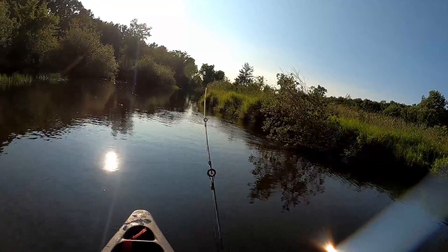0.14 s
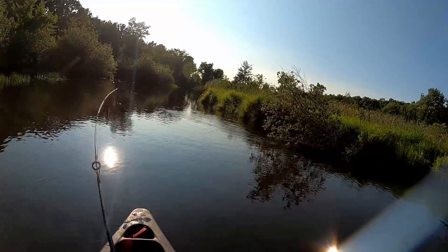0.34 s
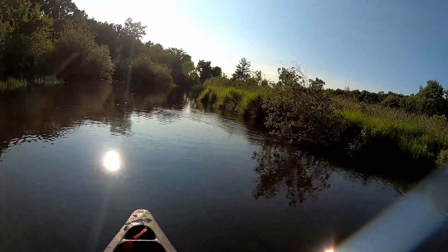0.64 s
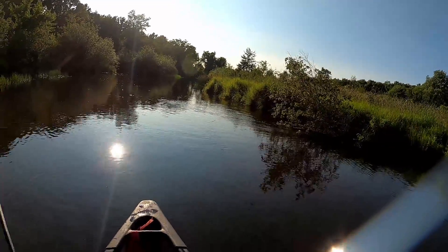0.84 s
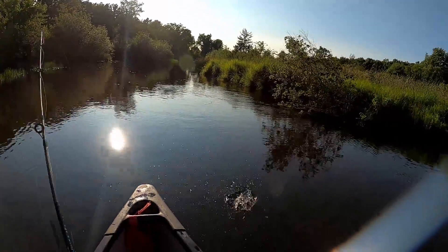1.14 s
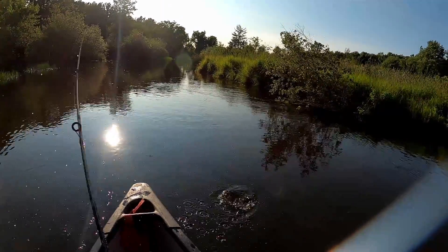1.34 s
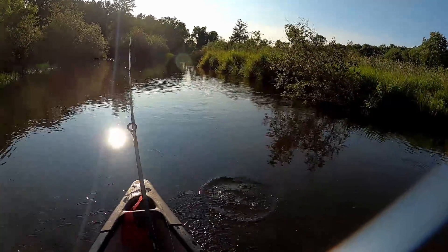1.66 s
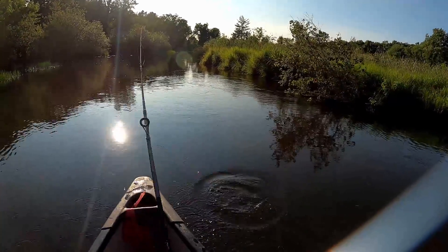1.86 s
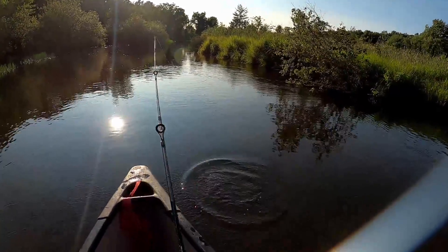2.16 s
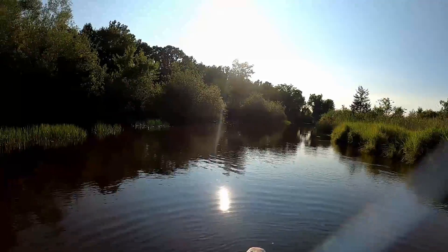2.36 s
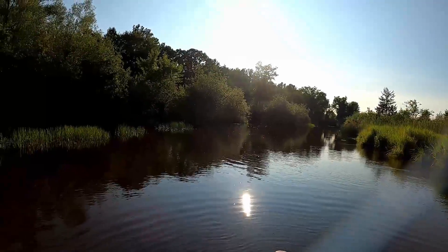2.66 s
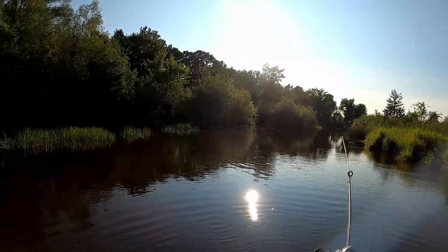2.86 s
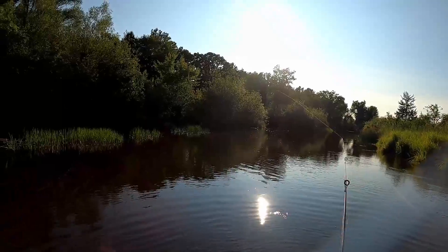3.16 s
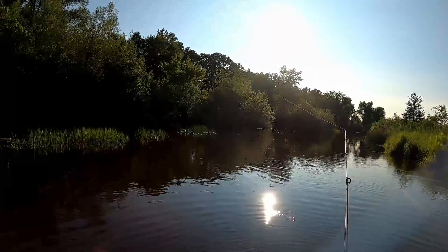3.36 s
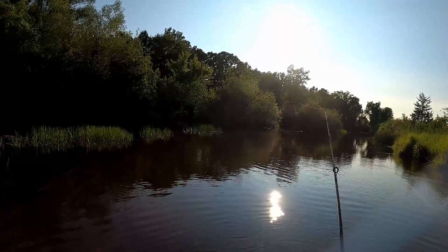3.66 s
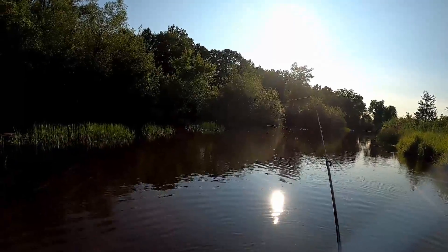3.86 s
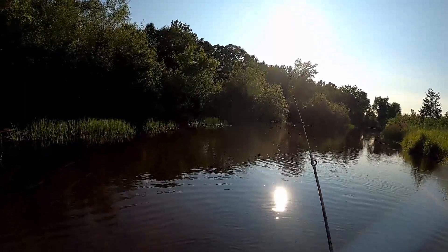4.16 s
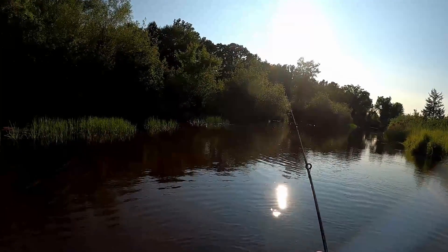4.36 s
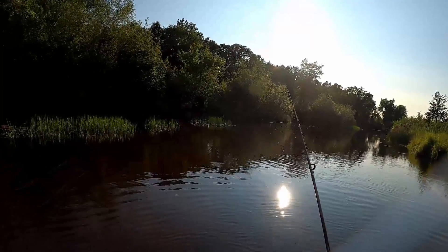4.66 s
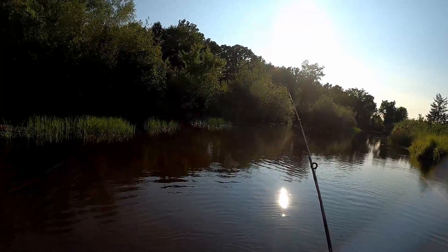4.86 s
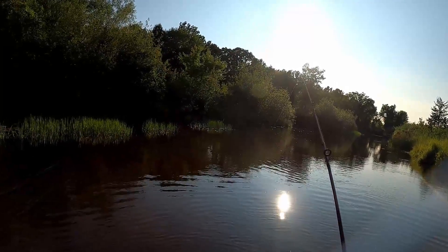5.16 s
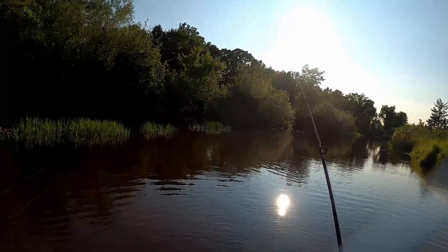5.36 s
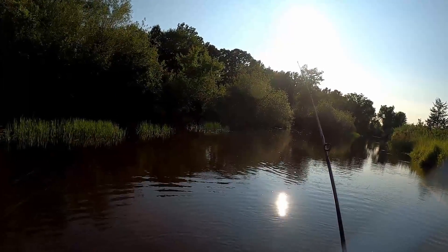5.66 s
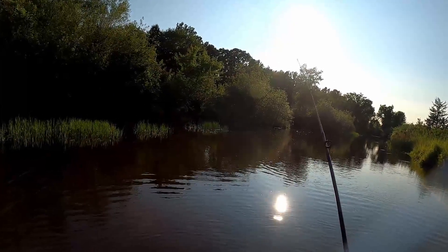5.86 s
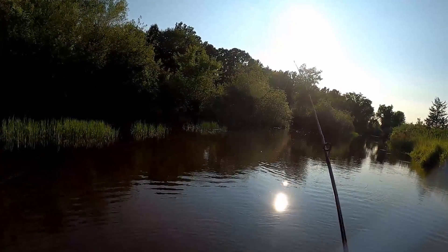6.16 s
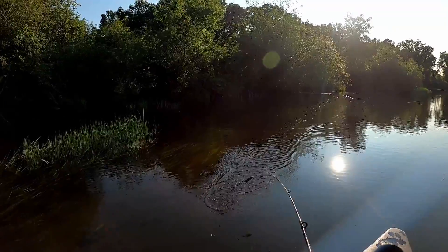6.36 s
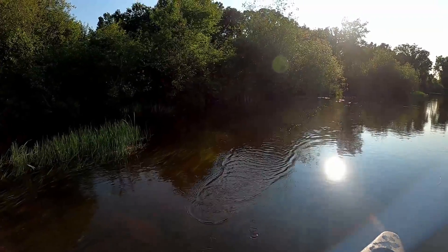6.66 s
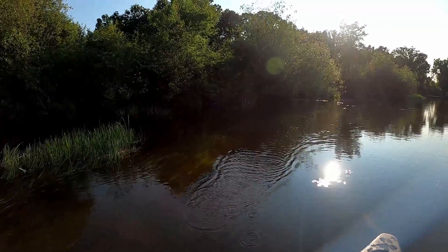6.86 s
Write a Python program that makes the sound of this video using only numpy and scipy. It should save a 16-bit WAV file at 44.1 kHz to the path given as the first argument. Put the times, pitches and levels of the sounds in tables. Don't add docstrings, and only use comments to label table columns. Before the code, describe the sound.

Close outdoor sound from a small plastic boat on still water. A reel grates in wet line; a lure breaks the surface with crisp splashes, bubbles and dripping. A sharp latch snap, then line hisses out with a high singing whirr and dull hull knocks. The latch clacks shut, light gear winding follows, and a loud snap comes near the end. Low wind buffets the microphone, strongest early.

```python
import sys
import numpy as np
from scipy import signal
from scipy.fft import rfft, irfft
from scipy.io import wavfile
from scipy.ndimage import uniform_filter1d

SR = 44100
rng = np.random.default_rng(int(sys.argv[2]) if len(sys.argv) > 2 else 0)


def gain_from_db(level_db):
    decades = np.asarray(level_db, float) / 20
    return 10 ** decades


def unload_wav(signal):
    wavfile.write(
        sys.argv[1],
        SR,
        np.round(np.clip(np.atleast_2d(signal).T, -1, 1) * 32767).astype(np.int16),
    )


N = 309052
T = np.arange(N) / SR


def in_time(rows):
    s, *columns = np.transpose(rows)
    return [np.interp(T, s, c) for c in columns]


def gate(rows):
    fade_in = np.clip((T - rows[0][0]) * 100 + .5, 0, 1)
    fade_out = np.clip((rows[-1][0] - T) * 100 + .5, 0, 1)
    return fade_in * fade_out


def hump(start, end):
    return np.sqrt(np.sin(np.pi * np.clip((T - start) / (end - start), 0, 1)).clip(0))


def rms_one(x):
    return x / np.sqrt(np.mean(x ** 2) + 1e-20)


def colour(x, spectrum, low_hz=1, high_hz=1e5):
    hz, points = np.arange(N // 2 + 1) * SR / N + 1e-3, np.array(spectrum)
    shaped = rfft(x) * gain_from_db(np.interp(np.log(hz), np.log(points[:, 0]), points[:, 1], -90, -90))
    inside = irfft(shaped * (hz > low_hz) * (hz < high_hz), N)
    return irfft(shaped, N) / inside.std()


def drift(rate):
    r = np.exp(-2 * np.pi * rate / SR)
    return rms_one(signal.lfilter([1], [1, -2 * r, r * r], rng.standard_normal(N + SR))[SR:])


def resonance(x, hz, width):
    r = np.exp(-np.pi * width / SR)
    top_gain = np.array([1, 0, -1]) * (1 - r * r) / 2
    return signal.lfilter(top_gain, [1, -2 * r * np.cos(2 * np.pi * hz / SR), r * r], x)


def double_resonance(x, hz, width):
    return resonance(resonance(x, hz, width), hz, width)


def singing(hz, width):
    low_pass = signal.butter(2, width / 2, fs=SR, output="sos")
    slow = signal.sosfilt(low_pass, rng.standard_normal((2, N)))
    phase = 2 * np.pi * np.cumsum(hz * np.ones(N)) / SR
    return rms_one(slow[0] * np.cos(phase) + slow[1] * np.sin(phase))


def swells(rows):
    return sum(gain_from_db(db + 3.4 * drift(23)) * hump(start, end) * singing(hz, width)
               for start, end, hz, width, db in rows)


def add(out, s, db, sound):
    i = round(s * SR)
    sound = sound[:N - i]
    out[i:i + len(sound)] += gain_from_db(db) * sound / np.abs(sound).max()


def rustle(rows, spectrum, grain_db, per_s, top_db, bright):
    body_db = in_time(rows)[0]
    top_db = body_db + top_db + 2.7 * drift(10) + bright * (body_db + 59)
    sizes = gain_from_db(4.8 * rng.exponential(1, N).clip(0, 4)) * rng.choice([-1, 1], N)
    grains = (rng.random(N) < per_s / SR) * sizes
    grains = np.convolve(grains, rng.standard_normal(90) * np.hanning(90))[:N]
    raw = rng.standard_normal(N) * gain_from_db(1.8 * drift(14)) + gain_from_db(grain_db) * rms_one(grains)
    hiss = colour(raw, spectrum, low_hz=700, high_hz=6000)
    body = signal.sosfiltfilt(signal.butter(4, 6000, fs=SR, output="sos"), hiss)
    return gate(rows) * (gain_from_db(body_db) * body + gain_from_db(top_db) * rms_one(hiss - body))


# time in seconds, level in dB.
WINDING = [
    [(0.0, -78), (0.36, -76.5), (0.46, -55.5), (0.58, -62.5), (1.15, -57), (1.28, -53.5), (1.61, -59.5),
     (2.2, -59.5), (2.26, -67)],
    [(2.26, -88), (2.502, -74), (2.722, -66), (2.88, -68)],
    [(4.4, -58.5), (4.446, -66.5), (4.826, -63.5), (4.972, -67.5), (5.326, -64.5), (6.27, -62.5)],
    [(6.27, -57), (6.366, -61), (6.604, -70.5), (6.808, -64), (7.008, -54)],
]
# frequency in Hz, density in dB per Hz.
WET_LINE = [(180, -28), (300, -0.5), (700, -4), (1020, 2), (3240, -4), (4920, -13), (8240, -37),
            (16000, -59)]
GEARS = [(180, -12), (300, 5), (440, -17), (678, -10.5), (1230, -3.5), (1780, 2.5), (2070, -0.5), (3520, 1),
         (4440, -11), (5700, -15), (7440, -27.5), (8790, -28), (16000, -57)]
LATE_GEARS = [(180, -26), (300, -7), (462, -10), (978, -14), (1170, -6), (1340, -12.5), (2980, -13.5),
              (4370, -15.5), (16000, -62.5)]


def winding():
    first, pause, second, last = WINDING
    out = rustle(first, WET_LINE, -8, 600, -9.5, 0.34)
    out += rustle(pause, CREEK, -26, 500, -3.5, .4)
    out += rustle(second, GEARS, -25, 440, -12.5, .2)
    return out + rustle(last, LATE_GEARS, -2.5, 400, -15.5, .15)


# start and end in seconds, centre and width in Hz, level in dB.
SINGING = [(0.53, 1.596, 1052, 260, -65), (.9, 1.6, 4950, 300, -72), (1.3, 2.25, 9000, 350, -79),
           (1.6, 2.253, 3560, 700, -62.5), (2.896, 3.397, 9300, 503, -68.5),
           (3.097, 4.09, 8760, 355, -76.5), (3.915, 4.382, 8970, 500, -73.5), (4.136, 4.33, 3460, 120, -58),
           (4.119, 4.382, 2730, 220, -61), (4.121, 4.3, 4750, 300, -67), (4.14, 4.382, 11800, 900, -83),
           (4.958, 6.28, 3267, 597, -70), (6.26, 6.417, 5000, 200, -70), (6.42, 6.554, 2850, 150, -68),
           (6.762, 6.94, 3060, 350, -64), (6.295, 7.046, 1050, 350, -65)]


def line_and_gears_sing():
    return swells(SINGING)


# time in seconds, level in dB, song of the first guide in Hz.
CAST = [
    (2.88, -60, 2783),
    (2.964, -49.5, 2704),
    (3.074, -47, 2800),
    (3.344, -49.5, 2725),
    (3.616, -53, 2638),
    (3.746, -58, 2502),
    (4.048, -63.5, 2510),
    (4.28, -59, 2910),
    (4.4, -67, 2690),
]
# frequency in Hz, density in dB per Hz.
GUIDES = [(900, -23), (1500, -15.5), (2100, -16.5), (3500, -15), (5900, -22.5), (8000, -22), (10500, -31.5),
          (16000, -43)]
# multiple of the first guide, width in Hz, level in dB.
GUIDE_SONG = [(1, 650, -3.5), (1.522, 700, -14.5), (2.45, 890, -18)]


def cast():
    out = gain_from_db(-4.5) * rustle(CAST, GUIDES, -19, 900, -12.5, -.3)
    line_db, guide_hz = in_time(CAST)
    for multiple, width, db in GUIDE_SONG:
        out += gate(CAST) * gain_from_db(line_db + db + 1) * singing(multiple * guide_hz, width)
    return out


# time in seconds, turns per second, level in dB.
SPOOL = [
    (2.97, 330, -53),
    (3.005, 378, -54.5),
    (3.07, 412, -55),
    (3.17, 367, -66.5),
    (3.33, 330, -71),
]


def spool():
    hz, level_db = in_time(SPOOL)
    hum = np.sqrt(2) * np.sin(2 * np.pi * np.cumsum(hz) / SR)
    return gate(SPOOL) * gain_from_db(level_db + 2.5 * drift(34)) * hum


# time in seconds, peak in dB, rattle t60 in seconds, lead-in in dB,
# lower and upper catch mode in Hz.
LATCH = [
    (0.4705, -27, 0.098, -18, 1750, 2400),
    (2.6689, -13, 0.075, -17, 1990, 3750),
    (4.626, -31, 0.041, -30, 3000, 3400),
    (4.6391, -16, 0.085, -13, 2130, 2900),
    (6.9347, -9, 0.055, -39, 1900, 3260),
]
# frequency in Hz, width in Hz, level in dB.
REEL = [(800, 400, -10), (5300, 500, -4), (7000, 800, -13), (8900, 800, -14)]
# frequency in Hz, width in Hz, level in dB.
RATTLE = [(2000, 600, -3), (3400, 500, -1), (4000, 400, 1), (4900, 600, 0), (6600, 900, -3),
          (9000, 1200, -14)]


def latch():
    catch_width_hz, upper_mode_db, rattle_db = 560, 0, -0.5
    second_contact_db, snap_top_hz = -11, 10500
    out, t = np.zeros(N), T[:SR // 7] - 1323 / SR
    for s, peak_db, t60, lead_db, low_hz, upper_hz in LATCH:
        shape = gain_from_db(second_contact_db) * np.exp(-((t - .0047) / .001) ** 2)
        shape += np.where(t > 0, gain_from_db(-9 - 60 * t / t60), gain_from_db(lead_db + 60 * t / .06))
        scrape = rng.standard_normal(len(t)) * shape
        rattle = sum(gain_from_db(db) * resonance(scrape, hz, width) for hz, width, db in RATTLE)
        push = np.zeros(len(t))
        push[[1350, 1374]] = 1, .9
        modes = [(low_hz, catch_width_hz, 0), (upper_hz, catch_width_hz, upper_mode_db)] + list(REEL)
        snap = sum(gain_from_db(db) * resonance(resonance(push, hz, width), hz, 2 * width) for hz, width, db in modes)
        mix = snap / np.abs(snap).max() + gain_from_db(rattle_db) * rattle
        dull = signal.butter(2, snap_top_hz * gain_from_db(0.35 * (peak_db + 13)), fs=SR)
        add(out, s + t[0], peak_db, signal.lfilter(*dull, mix))
    return out


# start in seconds, length in seconds, level in dB, centre in Hz.
SPLASH = [(1.074, .06, -45, 1900), (1.09, .03, -48, 4870), (1.096, 0.037, -45, 1050),
          (1.332, 0.06, -46.5, 1270), (1.36, 0.041, -47.5, 576), (2.891, .05, -56, 500),
          (2.912, .04, -50, 750), (3.34, .08, -57, 350), (4.641, .006, -33, 6300), (4.645, .01, -36, 2400),
          (4.459, .03, -52, 1100), (1.082, .02, -43, 1400), (1.362, .025, -45, 1500)]


def splash():
    sizes = gain_from_db(4.4 * rng.exponential(1, N).clip(0, 3.5)) * rng.choice([-1, 1], N)
    grains = (rng.random(N) < 3000 / SR) * sizes
    out = np.zeros(N)
    for s, length, db, hz in SPLASH:
        age = np.clip((T - s) / length, 0, 9)
        envelope = age ** 0.36 * np.exp(-2 * age ** 2)
        out += gain_from_db(db + 9.0) * envelope * rms_one(double_resonance(grains, hz, 1.3 * hz))
    return out


# time in seconds, drops per second, level in dB.
SPRAY = [
    (.85, 170, -70.5),
    (1.1, 500, -62.5),
    (1.4, 500, -60.5),
    (1.8, 600, -62),
    (2.24, 600, -62),
]


def spray():
    per_s, level_db = in_time(SPRAY)
    born = rng.random(N) < 1.6 * per_s * gain_from_db(6 * drift(18)) / SR
    sizes = born * gain_from_db(2.5 * rng.exponential(1, N).clip(0, 2.5)) * gate(SPRAY) + 1e-18
    dealt = rng.integers(0, 20, N)
    rings = np.zeros(N)
    for k, hz in enumerate(np.geomspace(1300, 4300, 20)):
        rings += resonance(resonance(sizes * (dealt == k), hz, .07 * hz), hz, .2 * hz) / np.sqrt(hz)
    return gain_from_db(level_db - 1.5) * rms_one(rings)


# start and end in seconds, centre and width in Hz, level in dB.
GURGLE = [(1.18, 1.33, 2300, 900, -60), (1.2, 1.33, 3600, 700, -62), (1.42, 1.5, 2800, 1300, -59),
          (1.54, 1.62, 2500, 1200, -61), (1.66, 1.75, 2800, 900, -60), (1.78, 1.88, 2800, 800, -60),
          (1.81, 1.9, 1300, 500, -65), (1.91, 1.99, 1900, 700, -62), (1.9, 2, 3400, 800, -62),
          (2.05, 2.12, 2500, 1800, -61), (2.15, 2.21, 2000, 600, -59), (.45, .54, 1500, 900, -62),
          (.6, 1.05, 2500, 2000, -66)]


def gurgle():
    return swells(GURGLE)


# time in seconds, peak in dB, pitch in Hz, t60 in seconds, rise per second.
BUBBLES = [(1.097, -34, 1024, 0.047, 2), (1.137, -49, 680, 0.057, 3.1), (1.38, -25, 1230, 0.032, 6.8),
           (1.512, -43, 970, 0.098, 4.4), (1.176, -44, 1350, .06, 6), (1.297, -42, 2200, .03, 8),
           (1.341, -33, 2400, .02, 5), (1.45, -42, 2500, .025, 12), (1.6, -41, 1750, .04, 8),
           (1.7, -46, 2700, .04, 6), (1.84, -46, 2700, .04, 8), (2.16, -44, 1900, .05, 6),
           (2.443, -50, 720, .04, 3)]


def bubbles():
    out, t = np.zeros(N), T[:SR // 6]
    for s, peak_db, hz, t60, rise in BUBBLES:
        tone = np.sin(2 * np.pi * hz * (t + rise * t * t / 2))
        add(out, s, peak_db, tone * gain_from_db(-60 * t / t60) * (1 - np.exp(-t / 0.0052)))
    return out


# time in seconds, peak in dB, centre in Hz, decay t60 in seconds.
TICKS = [(0.9909, -30.5, 2050, 0.017), (1.0735, -31, 6000, 0.035), (1.0895, -21, 2000, 0.014),
         (1.145, -38, 4700, 0.015), (1.083, -22.5, 1900, 0.02), (1.1714, -41, 1500, 0.04),
         (1.0985, -27, 2100, .02), (1.104, -31, 6500, .02), (1.118, -30, 2300, .03),
         (1.1855, -32, 2500, .012), (1.3237, -33, 2930, .02), (1.366, -33, 2800, .02),
         (1.44, -36, 4500, .015), (1.487, -43, 5000, .012), (1.591, -38, 1800, .03),
         (1.6834, -38, 3500, .015), (1.768, -33, 1800, .03), (1.936, -41, 5000, .012),
         (2.0045, -35, 3300, .012), (2.027, -41, 4000, .02), (2.1, -39, 3500, .015),
         (2.204, -39, 3200, .015), (1.2222, -37, 3590, 0.022), (1.2541, -39, 5500, 0.02),
         (1.268, -43, 9000, 0.018), (1.3408, -28, 2500, 0.03), (1.3714, -19, 4600, 0.01),
         (1.4072, -33, 2570, 0.03), (1.51, -33.5, 4000, 0.013), (1.52, -33.5, 2350, 0.035),
         (1.6042, -34.5, 2010, 0.037), (1.628, -34.5, 2150, 0.015), (1.657, -34, 2320, 0.015),
         (1.732, -35, 3430, 0.016), (1.7598, -28, 3000, 0.022), (1.862, -37, 2940, 0.043),
         (1.878, -34.5, 3760, 0.027), (1.9076, -34.5, 3380, 0.033), (1.973, -39, 2550, 0.04),
         (2.011, -29, 1850, 0.04), (2.1192, -37.5, 2000, 0.014), (2.1505, -31, 2500, 0.025),
         (2.2175, -36.5, 2580, 0.025)]
SPARSE_TICKS = [(0.508, -44, 3280, 0.031), (.4258, -46, 3490, .02), (.484, -44, 4500, .03),
                (.6133, -48, 2700, .02), (.7141, -45, 2800, .02), (2.544, -53, 4000, .03),
                (2.567, -52, 3800, .03), (0.5774, -45, 3430, 0.051), (0.877, -45, 2260, 0.044),
                (2.38, -51, 4370, 0.04), (2.442, -51, 1590, 0.021), (2.9176, -37, 3530, 0.14),
                (3.4071, -36.5, 6500, 0.091), (3.487, -38, 3980, 0.053), (3.5032, -35, 2650, 0.033),
                (4.1455, -50, 2510, 0.045), (4.213, -31, 3540, 0.098), (4.3906, -46, 4200, 0.049),
                (4.445, -43, 4470, 0.072), (4.467, -41, 3180, 0.053), (4.4804, -38.5, 3250, 0.04),
                (4.689, -45, 3180, 0.036), (4.8145, -41.5, 2740, 0.021), (6.1155, -52, 3240, 0.04),
                (6.1487, -36, 2200, 0.03), (6.6313, -51, 2340, 0.047), (6.832, -47, 3020, 0.048)]


def ticks():
    out, t = np.zeros(N), T[:SR // 8]
    for s, peak_db, hz, t60 in list(TICKS) + list(SPARSE_TICKS):
        burst = rng.standard_normal(len(t)) * gain_from_db(-60 * t / t60) * (1 - np.exp(-t / 0.0004))
        crack = resonance(resonance(burst * gain_from_db(-60 * t / .01), 3600, 5000), 3000, 3500)
        add(out, s, peak_db - 1.5, double_resonance(burst, hz, 0.64 * hz) + gain_from_db(-10) * crack)
    return out


# time in seconds, peak in dB, deep modes in dB, late mode in dB.
KNOCK = [
    (2.889, -30.5, 5.5, -12),
    (2.936, -39, 2, -10),
    (3.336, -31.5, 4, -10.5),
    (3.747, -45.5, 11.5, -10),
    (4.461, -35.5, -18, -19.5),
    (4.987, -59.5, 18, -6),
]
# frequency in Hz, level in dB, t60 in seconds.
HULL = [(150, 8, 0.16), (205, 21.5, 0.025), (294, -0.5, 0.24), (710, -3, 0.016), (770, 1, 0.036),
        (1002, -22, 0.03), (1380, -14, 0.012)]


def hull():
    out, t = np.zeros(N), T[:SR // 5]
    for s, peak_db, deep_db, late_db in KNOCK:
        for deep, gain_db in ((False, 0), (True, deep_db)):
            modes = [m for m in HULL if (m[0] < 450) == deep]
            ring = sum(gain_from_db(db + rng.normal(0, 2) - 60 * t / t60) * np.sin(2 * np.pi * hz * t)
                       for hz, db, t60 in modes)
            add(out, s + 0.0075 * deep, peak_db + gain_db, ring * (1 - np.exp(-t / 0.0023)))
        air = np.sin(2 * np.pi * 534 * (t - 1.5 * t * t)) * t * gain_from_db(-60 * t / 0.074)
        add(out, s + 0.0047, peak_db + late_db - 3, air)
    return out


# time in seconds, peak in dB, pitch in Hz.
THUMPS = [(.281, -27, 75), (.32, -36, 150), (.354, -27, 80), (.555, -30, 50), (.645, -27, 75),
          (1.82, -30, 110), (1.87, -28, 130), (1.92, -27, 140), (1.94, -21, 50), (2.029, -27, 62),
          (2.258, -26, 120), (2.295, -27, 110), (2.283, -23, 90), (2.53, -23, 55), (2.56, -28, 50),
          (2.61, -31, 70), (4.15, -34, 130), (4.17, -32, 60), (4.21, -34, 110), (4.89, -38, 55),
          (6.3, -36, 50), (6.43, -36, 45)]


def thumps():
    out, t = np.zeros(N), T[:SR // 10] - .05
    for s, peak_db, hz in THUMPS:
        push = np.sin(2 * np.pi * hz * t + 0.8) * np.exp(-(t * hz / 0.6) ** 2)
        add(out, s + t[0], peak_db, rng.choice([-1, 1]) * push)
    return out


# frequency in Hz, density in dB per Hz.
GUST = [(11, -19), (18, 0.5), (54, 0.5), (90, -5.5), (130, -19), (300, -53.5)]
BREEZE = [(50, -53), (90, 2), (150, -2), (230, -6.5), (290, -19), (420, -30), (650, -46), (1200, -68)]
# time in seconds, deep level in dB.
CALM = [(0, -48), (.17, -54), (.45, -39.5), (.76, -57.5), (1.17, -48), (1.75, -57), (2.2, -53),
        (2.71, -49.5), (3.01, -56), (3.4, -54), (3.49, -68), (3.55, -43), (3.75, -43.5), (3.9, -52.5),
        (4.59, -65), (4.95, -54), (5.62, -55), (7.01, -53.5)]
# time in seconds, peak in dB, seconds to fall 10 dB, flutter share in dB.
GUSTS = [(0.282, -29.5, .02, -13), (0.359, -30, 0.0364, -10.5), (.555, -33.5, 0.05, -25),
         (0.646, -32.5, 0.07, -20), (.8, -45, 0.11, -20), (.9, -47, 0.03, -16), (1.5, -42, .06, -10.5),
         (1.851, -30.5, 0.0347, -9), (1.94, -24, 0.0219, -9), (2.029, -27.5, 0.03, -30),
         (2.111, -36, 0.04, -24), (2.27, -34, .03, -3), (2.32, -29.5, 0.0347, -15.5),
         (2.42, -43, 0.05, -12), (2.54, -30, 0.07, -18.5), (2.62, -35, 0.07, -16.5),
         (2.86, -33.5, 0.08, -10.5), (3.94, -49, 0.24, -9), (4.18, -35.5, 0.07, -8), (4.45, -53, .06, -18),
         (4.89, -42.5, 0.13, -18), (5.74, -49, .06, -10), (6.17, -44, 0.1, -11.5), (6.3, -39, 0.06, -14.5),
         (6.44, -39.5, 0.07, -17), (6.69, -48.5, 0.2, -10.5)]


def wind():
    gust_rise = .7
    gust_flutter_db, gust_top_hz = 4.5, 122
    lean_from_db, lean_db_per_db = -54, 1.15
    calm_db, = in_time(CALM)
    deep_power, flutter_power = gain_from_db(2 * calm_db), 0
    calm_flutter = gain_from_db(-56.5 + 0.25 * (calm_db + 54.5))
    for s, peak_db, fall_s, flutter_db in GUSTS:
        fallen = np.maximum(T - s, (s - T) / gust_rise) / fall_s
        power = gain_from_db(2 * (peak_db - 10 * fallen - 1.3))
        deep_power = deep_power + power
        flutter_power = flutter_power + gain_from_db(2 * flutter_db) * power
    both = []
    for port in range(2):
        parts = [colour(rng.standard_normal(N) * gain_from_db(1.57 * drift(32)), shape) for shape in (GUST, BREEZE)]
        deep, flutter = [p / np.sqrt(uniform_filter1d(p * p, size=2600) + 0.14) for p in parts]
        low_flutter = resonance(flutter, gust_top_hz, 110)
        both.append(np.sqrt(deep_power) * deep + calm_flutter * flutter
                    + gain_from_db(gust_flutter_db) * np.sqrt(flutter_power) * low_flutter)
    both[0] = both[0] + thumps()
    pan_db = lean_db_per_db * (10 * np.log10(deep_power) - lean_from_db).clip(0)
    lean = np.tanh(pan_db * np.log(10) / 40)
    return np.array([both[0], lean * both[0] + gain_from_db(-3) * both[1]])


# frequency in Hz, density in dB per Hz.
CREEK = [(180, -11), (300, -1), (584, -7), (1280, -5), (4230, -20), (5080, -17), (7440, -28.5),
         (10600, -43), (16000, -58)]


def creek():
    return gain_from_db(-65) * colour(rng.standard_normal(N), CREEK)


# time in seconds, bass from 0 to 1, treble from 0 to 1, lean to the left from 0 to 1.
APART = [
    (0, 1, 0.96, 0.21),
    (2.25, 0.7, 0.53, 0.33),
    (2.265, 0, 0.03, 0.2),
    (5.92, 0.01, 0.02, 0.3),
    (6.26, 0.96, 0.16, 0.1),
    (6.29, 0.93, 1, 0.19),
    (7.01, 0.6, 1, 0.12),
]


def scene():
    bass, treble, lean = in_time(APART)
    near = winding() + line_and_gears_sing() + cast() + spool() + latch()
    near += splash() + spray() + gurgle() + bubbles() + ticks() + hull() + creek()
    scattered = resonance(near, 5000, 18000)
    for lag in (7, 17, 37, 71):
        taps = np.r_[1, np.zeros(lag - 1), .6]
        scattered = signal.lfilter(taps[::-1], taps, scattered)
    top = signal.sosfilt(signal.butter(8, 11300, "high", fs=SR, output="sos"), scattered)
    blow, blow_side = wind()
    side = treble * gain_from_db(1.5) * (lean * near + scattered) + bass * blow_side
    side += (1 - treble) * (gain_from_db(-46) * scattered + gain_from_db(1.0) * top)
    return np.array([near + blow + side, near + blow - side])


def band_limit(x):
    return signal.sosfilt(signal.butter(12, 16810, fs=SR, output="sos"), x)


def record(dry):
    mix = signal.sosfilt(signal.cheby2(10, 50, 16900, fs=SR, output="sos"), dry)
    return band_limit(mix)


dry = scene()
out = record(dry)
unload_wav(out)
```